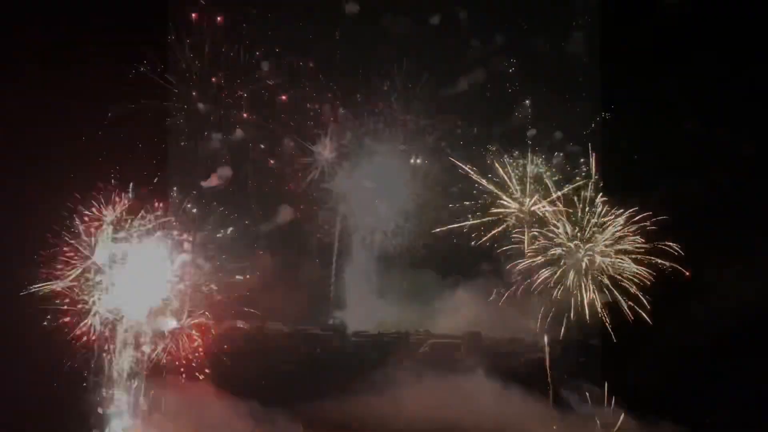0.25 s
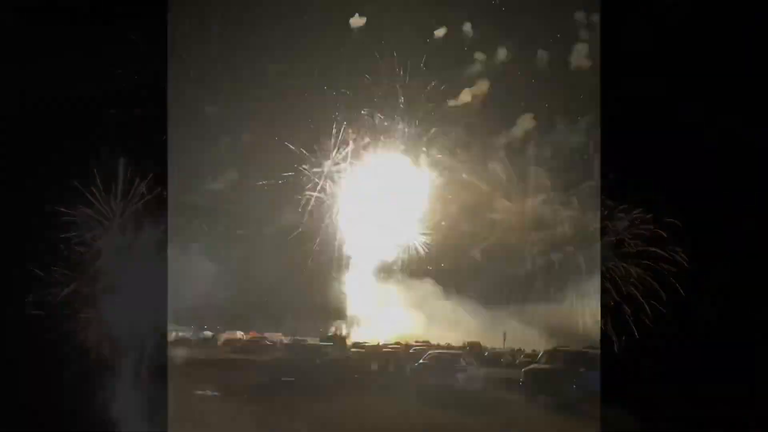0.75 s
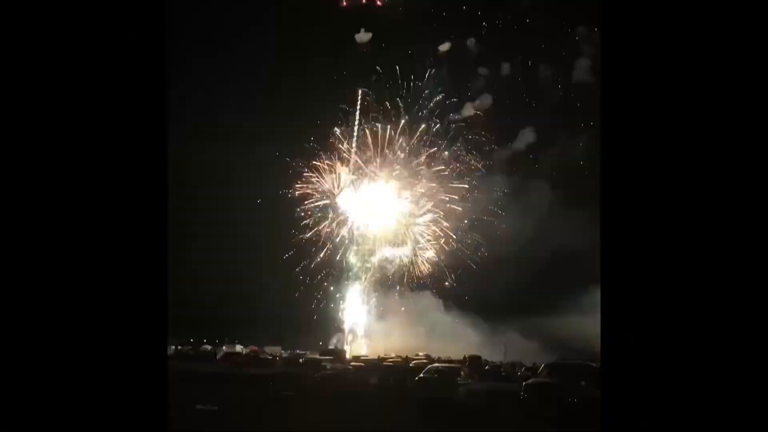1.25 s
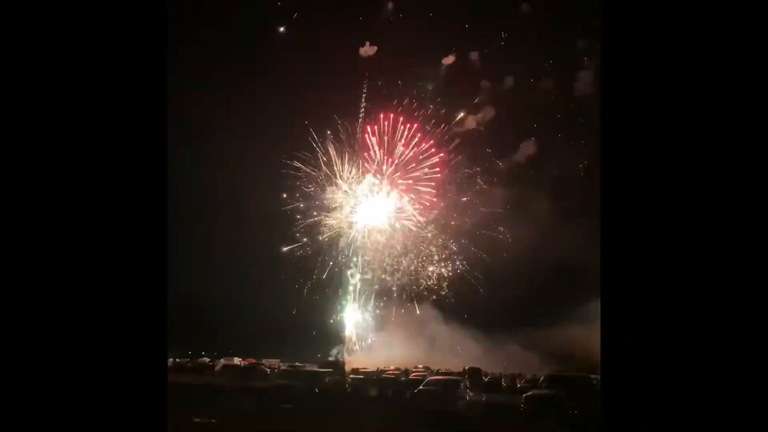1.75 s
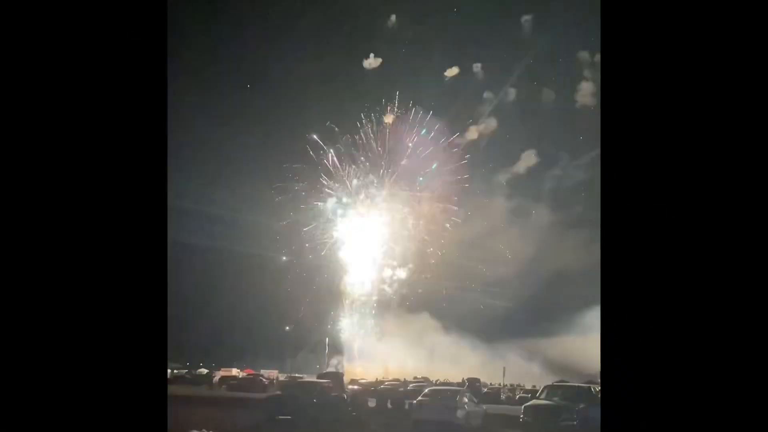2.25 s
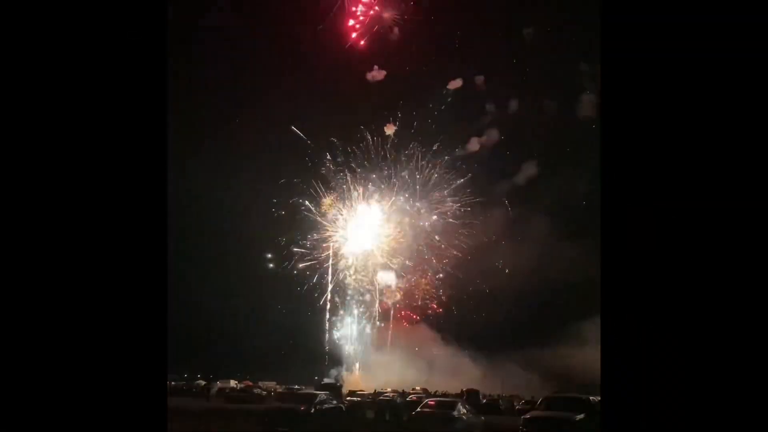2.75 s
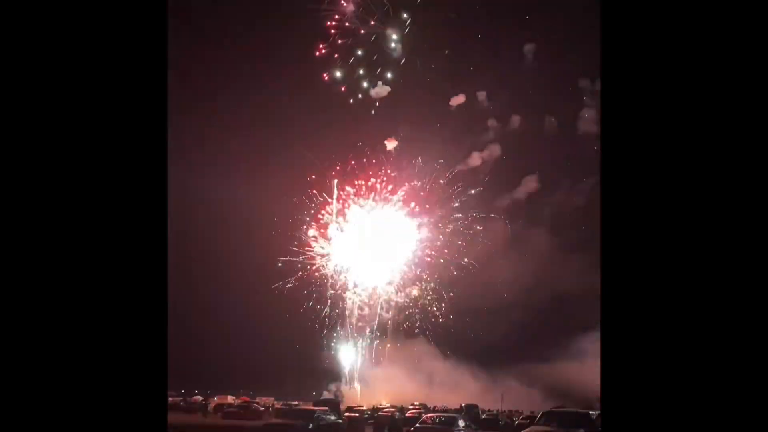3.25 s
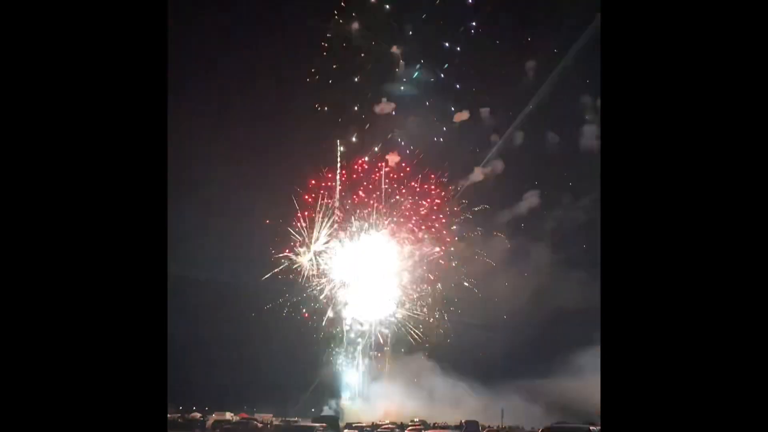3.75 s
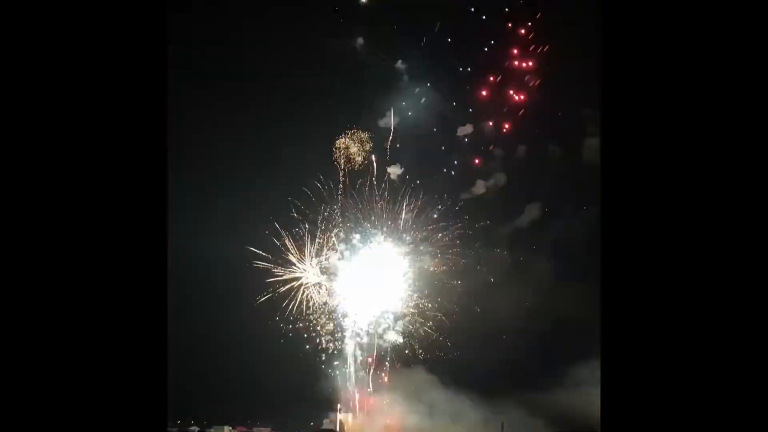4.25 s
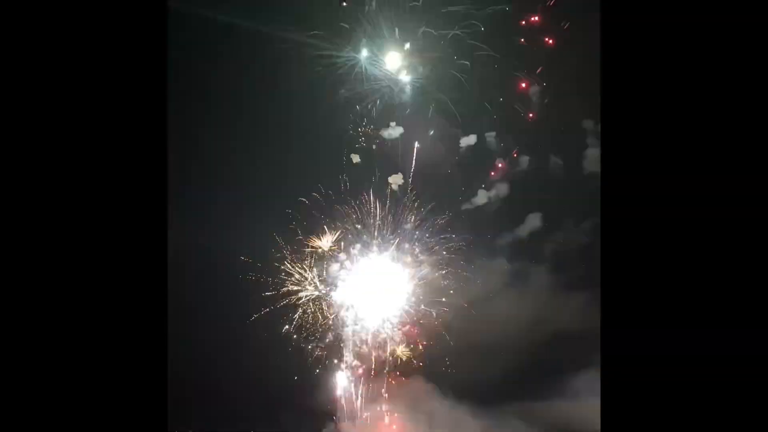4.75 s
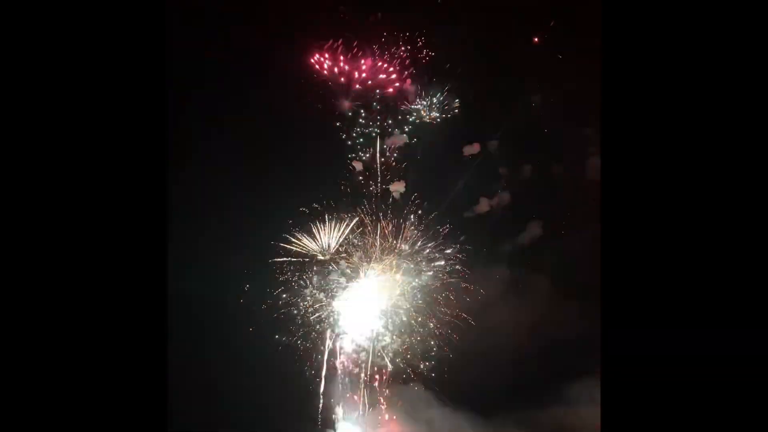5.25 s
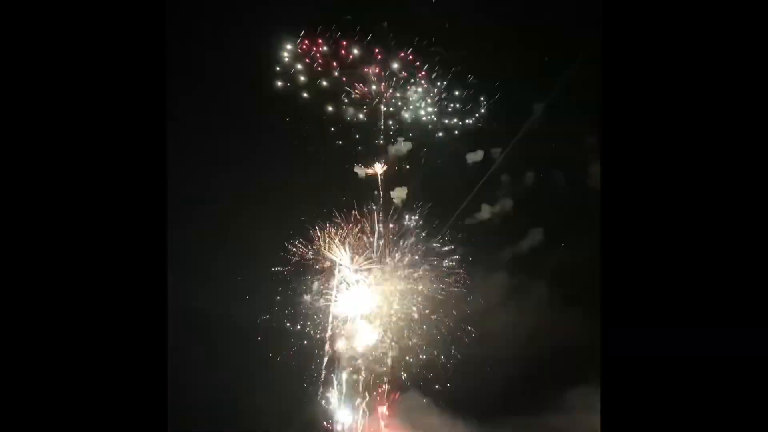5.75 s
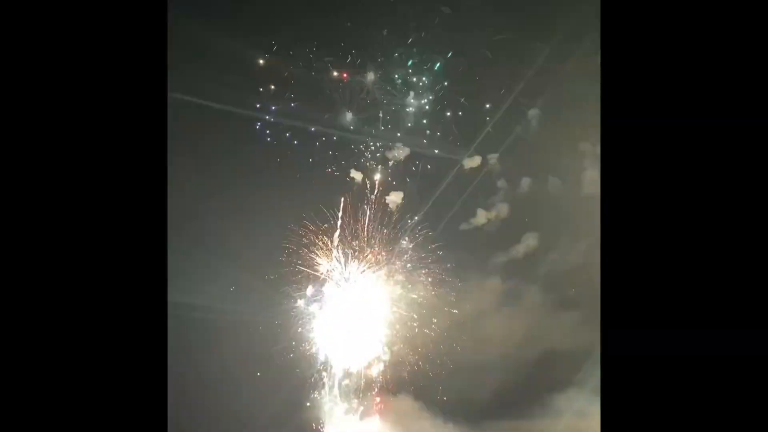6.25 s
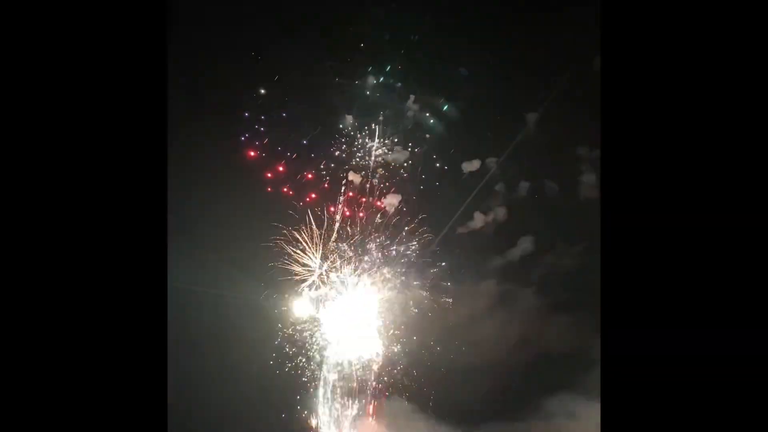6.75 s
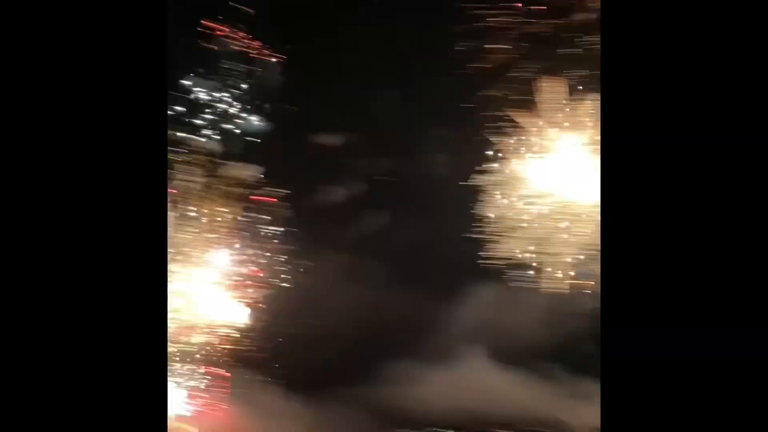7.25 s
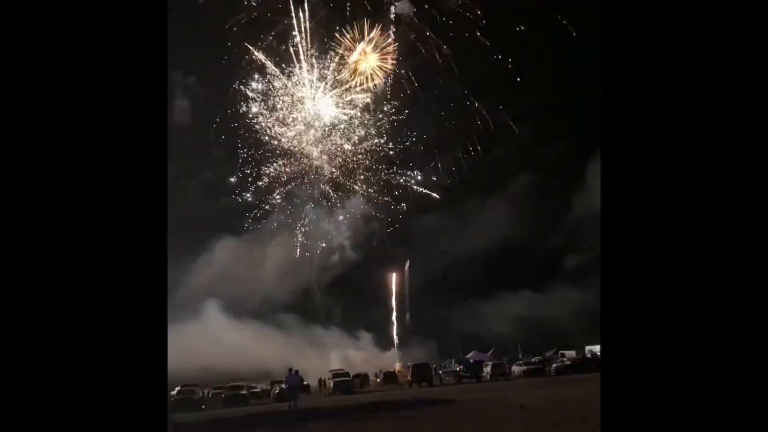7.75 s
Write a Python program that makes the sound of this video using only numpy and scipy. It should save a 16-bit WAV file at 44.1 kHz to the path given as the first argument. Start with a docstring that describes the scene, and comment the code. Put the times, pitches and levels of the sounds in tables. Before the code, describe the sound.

Many fireworks shells burst a few hundred metres away over an open field of parked cars. Punchy bangs, about forty a second, overlap irregularly with weaker pops filling the gaps. Each has a quick ground echo and short ragged scatter, above a low lumpy rumble. The barrage is already going at the start, thickens around two to three seconds, thins slightly near five, then surges again. Handheld stereo pickup, peaks rounded, little high treble.

```python
"""An open field full of parked cars: a barrage of fireworks shells bursts a few hundred metres away.
Each burst sends an N-shaped blast that arrives twice, direct and off the ground; lesser pops follow at random.
Sparse random echoes scatter it back from cars and trees, over a low, lumpy bed of noise for merged far echoes.
A handheld recorder with two ports spreads every blast into a short falling chirp and rounds the peaks."""
import sys
import numpy as np
from scipy import signal
from scipy.fft import rfft, irfft, next_fast_len
from scipy.io import wavfile

SR = 44100
rng = np.random.default_rng(int(sys.argv[2]) if len(sys.argv) > 2 else 0)


def to_wav(s):
    """Save 16-bit WAV."""
    ch = np.atleast_2d(s).T  # columns
    pcm = np.round(np.clip(ch, -1, 1) * 32767)  # PCM
    wavfile.write(sys.argv[1], SR, pcm.astype(np.int16))


N = 352359
SIZE = next_fast_len(N + 2 * SR)   # room for the scatter tail
HZ = np.maximum(np.arange(SIZE // 2 + 1) * SR / SIZE, 1)

# main shell bursts: start_s, front_level_db, blast_length_ms
SHELLS = [(0.018, -7, 4.6), (0.0214, -3, 1.7), (0.051, -3, 2.2), (0.0946, -8.5, 1.5), (0.118, -2, 1.8),
          (0.1405, -10.5, 2.4), (0.168, -20, 1.4), (0.1878, -15, 1.8), (0.212, 4, 2.5), (0.234, -4.5, 2.0),
          (0.2436, -3.5, 3.2), (0.276, -7.5, 2), (0.3, -6, 2.2), (0.3147, -6.5, 2.2), (0.3537, -15, 1.4),
          (0.3756, -4, 1.6), (0.4012, -9, 1.6), (0.4319, -11, 1.6), (0.4386, -3, 2.0), (0.456, -2.5, 2.8),
          (0.48, -7, 2.4), (0.502, -5.5, 2.1), (0.5078, -2.5, 2.0), (0.5328, -2.5, 0.92),
          (0.5596, 1.6, 2.5), (0.5988, -6, 1.8), (0.626, -9, 0.79), (0.6562, -5.5, 2.2), (0.689, -9.5, 2.6),
          (0.701, -1.5, 2.0), (0.7212, -2.5, 1.6), (0.7514, -4.5, 1.6), (0.7876, -3, 1.7),
          (0.7988, -10.5, 2), (0.8155, -3.5, 0.94), (0.8258, -8.5, 2.3), (0.9069, -4.5, 1.7),
          (0.9459, 0, 2.0), (0.9504, 0, 3.6), (0.9995, -1.5, 1.5), (1.0072, -7.5, 1.4), (1.041, -1.5, 2.2),
          (1.0535, 3.5, 3.2), (1.095, -3, 1.3), (1.1013, 2, 1.8), (1.114, -7, 1.5), (1.1349, -8, 2.6),
          (1.1479, 2, 2.5), (1.1667, -6, 2.5), (1.1935, 2.1, 2.2), (1.2276, -6.5, 2.0), (1.2486, -5, 1.6),
          (1.2577, -5.5, 1.9), (1.2641, 0.5, 2.3), (1.3167, -4, 1.4), (1.3276, 4, 2), (1.3354, -2.5, 2.0),
          (1.3557, 4.2, 2.4), (1.3651, -7.5, 2.0), (1.397, -8, 1), (1.4269, -1.6, 2.0), (1.448, -4, 2.5),
          (1.4571, -6, 3), (1.4793, -1, 2.0), (1.4904, -2, 1.8), (1.5272, 1.6, 2.5), (1.5758, -4, 1.8),
          (1.5828, -2.5, 1.6), (1.5866, -0.9, 4.3), (1.622, -1.5, 1.7), (1.6274, -4.5, 2.0),
          (1.6394, -3.9, 1.8), (1.684, -3.5, 1.7), (1.6997, -11, 1.4), (1.7189, -6, 1.8),
          (1.7476, 2.2, 2.0), (1.7531, -3.5, 2.0), (1.7972, 1.4, 4.2), (1.805, 2.6, 1.6),
          (1.8314, -2.8, 2.0), (1.8557, 2, 2.2), (1.8801, -6.5, 2.0), (1.8851, -4, 1.9), (1.926, -5, 2.2),
          (1.9348, 0.2, 1.8), (1.9721, 1.5, 2.0), (1.9944, -3.5, 2.5), (2.0066, -1.3, 2.2),
          (2.0185, 0.5, 1.9), (2.023, -12.5, 1.6), (2.0329, -4, 1.6), (2.0449, -12, 1.6),
          (2.0963, 1.9, 2.4), (2.1174, 1.9, 2.7), (2.1817, -0.4, 2.0), (2.268, 0.8, 1.6), (2.2746, -4, 2.1),
          (2.2801, 0.1, 2.4), (2.298, -12, 1.3), (2.327, -3.2, 2.0), (2.378, -7, 1.6), (2.4026, 1.8, 2.0),
          (2.4196, -2.5, 2.1), (2.4359, 5.5, 7), (2.4476, -8.5, 3.5), (2.4798, -1, 1.6), (2.4987, -3, 1.8),
          (2.537, -15.5, 2), (2.572, 1.5, 4.2), (2.5807, 3, 5.5), (2.5972, -4.5, 1.3), (2.6128, 3.4, 2.0),
          (2.6194, 3.8, 2.0), (2.6242, -0.3, 3), (2.646, -1.5, 2.2), (2.679, -1.1, 2.8), (2.687, 1.3, 1.6),
          (2.6962, -7.5, 1.8), (2.699, 4.8, 4.2), (2.7047, 1.5, 2.7), (2.7114, 6, 3.6), (2.717, -0.3, 3.1),
          (2.7303, -5.5, 2.5), (2.7473, -3.5, 2.2), (2.7626, -6, 2.0), (2.7994, 4, 4.2), (2.8137, -7, 3),
          (2.8286, -7.5, 2), (2.8353, -7.5, 1.9), (2.845, -7, 2), (2.8642, -7.5, 1.2), (2.8726, -3, 2.0),
          (2.8908, -1, 3.9), (2.9061, -0.5, 2.7), (2.9116, -2, 2.0), (2.9176, -2.5, 1.6),
          (2.9301, -6.5, 2.8), (2.945, -3, 2.0), (2.9624, 0.5, 2.0), (2.979, -2.5, 2.9),
          (2.9965, 4.06, 3.6), (3.014, -0.5, 5.5), (3.0316, -9, 1.8), (3.0437, -3.5, 2.5),
          (3.0632, 1.5, 3.2), (3.0717, -2.5, 2.2), (3.095, -8.5, 1.7), (3.1019, -3.5, 2.3),
          (3.1158, -10, 1.9), (3.1269, -2, 2.6), (3.182, -8.5, 1.6), (3.2062, -5, 0.85), (3.2324, 2.6, 4.2),
          (3.2707, -6, 1.6), (3.311, 1, 1.8), (3.3235, -3.5, 0.86), (3.3383, -7, 0.88), (3.3528, -3, 2.5),
          (3.365, -6, 1), (3.3859, -7.5, 0.79), (3.3973, -2, 2.2), (3.4049, 1, 2.0), (3.4114, 1.7, 2.5),
          (3.4833, -7.5, 0.82), (3.4977, -1, 2.2), (3.52, -5, 1.6), (3.543, -6.5, 0.99), (3.552, -7, 1.6),
          (3.562, -2.4, 3.4), (3.5839, -1, 1.7), (3.6087, -6, 0.8), (3.6255, -10, 1.5), (3.6636, -1, 2.0),
          (3.6771, -4, 1.6), (3.6825, -1.8, 2.0), (3.6959, 2, 2.3), (3.7454, 0.2, 2), (3.7735, 2, 2),
          (3.7826, -5, 1.9), (3.8297, -2, 2.2), (3.9033, -4, 1.8), (3.917, 3, 2), (3.9281, -0.9, 4.2),
          (3.9525, 0.7, 2.5), (3.979, -8, 1.4), (3.9906, -3.5, 2.3), (3.9959, -1.1, 2.5), (4.135, -9, 1.6),
          (4.156, -7, 1.6), (4.2132, 2.9, 2.3), (4.2386, -3, 1.6), (4.257, -1, 2.0), (4.2718, -1.5, 1.6),
          (4.298, -9.5, 1.5), (4.3155, -5, 1.8), (4.3573, -7, 1.6), (4.3748, -6, 2.3), (4.3825, -8.5, 2.0),
          (4.4012, -9.5, 1.4), (4.4109, -1.5, 2.2), (4.4353, -5.8, 1.8), (4.4511, -2.5, 1.6),
          (4.457, -2.5, 1.2), (4.5032, 6, 5.6), (4.5648, -3, 1.9), (4.5981, 0.5, 4.1), (4.753, -6.5, 1.6),
          (4.8099, -6, 1.6), (4.8198, -8.5, 1.6), (4.8427, -5.5, 1.6), (4.8986, 0, 1.6), (4.934, -8, 1.6),
          (4.952, -5.5, 1.9), (5.0206, -6.5, 1.6), (5.0284, -5, 1.6), (5.0433, 1.3, 2.0),
          (5.0598, -3.5, 2.0), (5.069, -10.5, 1.3), (5.082, -5.5, 1.7), (5.115, -1.2, 2.0),
          (5.1442, -8, 1.1), (5.201, -0.4, 1.6), (5.2054, 4.15, 3), (5.23, -6.5, 1.4), (5.2426, -7.5, 2.2),
          (5.278, -12.5, 1.6), (5.3033, -3.9, 2.7), (5.3147, 5.5, 3.2), (5.3267, -8.5, 2.5),
          (5.371, -4.5, 1.8), (5.3941, -11.5, 1.5), (5.4303, -2, 1.9), (5.4611, -6.5, 1.5),
          (5.4875, -8, 1.5), (5.5096, -5, 1.6), (5.5149, -5.5, 2.2), (5.5671, -1.5, 1.6),
          (5.5996, -0.5, 2.8), (5.6056, 0, 2.0), (5.6278, 3.5, 3), (5.6611, -9, 1.1), (5.7572, -5.5, 2.1),
          (5.7669, -7, 1.6), (5.7906, -5.5, 1.9), (5.8475, -4.5, 1.8), (5.8932, -9, 1.1),
          (5.9467, -7.5, 1.1), (5.9656, -0.3, 2.0), (6.0268, -7.5, 1.8), (6.0395, -4, 1.6),
          (6.0445, -0.5, 2.0), (6.081, -12, 1.5), (6.1045, -5, 2.2), (6.1357, -2.5, 2.0),
          (6.1811, -5.5, 1.3), (6.2306, -2.0, 1.8), (6.2421, -7, 1.6), (6.273, -1, 1.6),
          (6.324, -10.5, 1.2), (6.3311, -1.5, 1.9), (6.336, -6.5, 1.4), (6.377, -9, 1.4), (6.3874, -4.5, 2),
          (6.3949, -5.5, 2.6), (6.4006, -3.5, 2.2), (6.4146, -13, 1.6), (6.4294, 1.4, 2.0),
          (6.4528, -5, 2.0), (6.4748, -3, 1.6), (6.5161, -9, 1.4), (6.5269, 2.5, 1.8), (6.5298, 3.5, 2.8),
          (6.5515, 2, 3.9), (6.5563, 2.5, 2.5), (6.5815, -5, 1.7), (6.6225, 5, 2.2), (6.6313, -5, 1),
          (6.655, -10, 1.2), (6.6686, -6, 1.6), (6.6771, -2, 1), (6.693, 0.5, 0.74), (6.7161, -5, 2.5),
          (6.7321, -2.5, 1.6), (6.7365, -4, 1.4), (6.7443, -2, 2.6), (6.7491, -0.5, 2.3),
          (6.8101, 1.5, 1.3), (6.8152, 5.5, 2.5), (6.8257, 3.5, 2.5), (6.8499, 4.5, 2.5),
          (6.885, -9.5, 1.1), (6.8962, -6.5, 1.6), (6.926, -7, 1), (6.9584, 2.6, 1.8), (6.981, -14.5, 1.4),
          (6.996, -1, 1.4), (7.0011, 2.4, 2.1), (7.0059, -6, 2.4), (7.0387, -11, 1.2), (7.0467, -1.5, 1.6),
          (7.055, -2, 2), (7.0757, -4.5, 1.3), (7.0884, -3.5, 1.6), (7.1393, 0.8, 3.8), (7.1438, -3.3, 2.5),
          (7.164, -1.5, 1.4), (7.1717, -3.8, 2.7), (7.2566, -4.0, 1.4), (7.2817, -8.5, 0.92),
          (7.3496, -1, 1.8), (7.3784, -6, 1.4), (7.3893, 0.3, 2.0), (7.4067, 0, 1.9), (7.4166, -2.5, 1.8),
          (7.4278, 3, 3), (7.4483, -2, 2.2), (7.465, -6.5, 2.0), (7.4836, 0.9, 1.1), (7.5135, -3.5, 1.6),
          (7.5403, -3.5, 1.2), (7.551, -3, 1.5), (7.5576, -4.5, 2.2), (7.5649, -5, 1.6), (7.595, -4, 1.4),
          (7.6324, 0, 2.3), (7.6534, -2.5, 2.0), (7.6913, -4.5, 1.1), (7.7254, 0.5, 1.9), (7.732, -4, 1.2),
          (7.7632, -9.5, 2.5), (7.7969, 1.6, 1.7), (7.8198, -6, 1.6), (7.8278, -3.5, 1.3),
          (7.8356, -6.5, 1.4), (7.853, -10, 1.4), (7.8724, -5.5, 1.6), (7.9037, -5.5, 1.3),
          (7.9283, -5.5, 1.6), (7.9389, -3.5, 1.6), (7.9474, -3, 4.2), (7.9763, -8, 1.6)]


def from_db(db):
    """Converts dB to amplitude gain."""
    return 10 ** (np.asarray(db) / 20)


def at_hz(points):
    """Interpolates a (Hz, value) curve over log frequency at every FFT bin."""
    hz, value = np.transpose(points)
    return np.interp(np.log(HZ), np.log(np.maximum(hz, 1)), value)


def filtered(order, cutoff_hz, x):
    """Butterworth high-pass."""
    return signal.sosfilt(signal.butter(order, cutoff_hz, "high", fs=SR, output="sos"), x)


def stereo_spectrum(mid, side):
    """Left and right spectra mixed from two unrelated noises: alike in the bass, unrelated in the treble."""
    alike_hz = 1800
    alike = 1 / (1 + (HZ / alike_hz) ** 2)
    common = np.sqrt(1 + alike) * rfft(mid, SIZE)
    opposed = np.sqrt(1 - alike) * rfft(side, SIZE) * [[1], [-1]]
    return (common + opposed) / np.sqrt(2)


def rumble():
    """Far echoes of earlier bursts, merged: shaped stereo noise whose level wanders at random."""
    level_db, lumps_db, lump_step = -27, 3.0, 1000   # lump_step in samples
    # relative spectrum of the merged echoes: frequency_hz, density_db_per_hz
    bed_spectrum = [(18, -38.5), (30, -9), (92, 0.5), (129, -8), (250, -11.5), (653, -31.5), (1050, -32.5),
                    (1500, -46.5), (3200, -50), (4500, -65.5), (7000, -85.5), (9100, -112), (15400, -120)]
    noise = rng.standard_normal((2, SIZE))
    bed = irfft(stereo_spectrum(*noise) * from_db(at_hz(bed_spectrum)), SIZE)[:, :N]
    knots = rng.standard_normal(N // lump_step + 2)
    lumps = np.interp(np.arange(N), np.arange(0, N + lump_step, lump_step), knots)
    return from_db(level_db + lumps_db * lumps) * bed / bed.std()


def far_scatter():
    """Stereo response of far cars, then far trees: sparse echoes that die away, denser and duller from the trees."""
    # far cars, far trees: t60_s, level_db, dullness_hz, echoes_per_s
    reflectors = [(0.248, -14, 9170, 1900), (1.498, -21, 1960, 6500)]
    t = np.arange(2 * SR) / SR
    response = 0
    for t60_s, level_db, dull_hz, echoes_per_s in reflectors:
        hits = (t > .001) * (rng.random(len(t)) < echoes_per_s / SR)
        echoes = from_db(-60 * t / t60_s) * hits
        unit_echoes = echoes / np.sqrt(np.sum(echoes ** 2) + 1e-12)
        mid, side = rng.standard_normal((2, len(t))) * unit_echoes
        response = response + from_db(level_db) * stereo_spectrum(mid, side) / (1 + 1j * HZ / dull_hz)
    return response


def near_paths(count):
    """Per blast, a short ragged tail off near cars above a corner pitch, with a brighter own part at each port."""
    t60_s, level_db, corner_hz = 0.048, -6.5, 560
    own_hz, own_db, taps = 1300, 2.5, 1200
    fade = from_db(-60 * np.arange(taps) / (SR * t60_s))
    unit_fade = fade / np.sqrt(np.sum(fade ** 2))
    tails = rng.standard_normal((count, 3, taps)) * from_db(level_db) * unit_fade
    shared, own = tails[:, :1], filtered(2, own_hz, tails[:, 1:])
    return filtered(1, corner_hz, shared + from_db(own_db) * own)


def n_wave(ms, level_db, length_ms, front_hz):
    """Shock wave: a jump, a straight fall into underpressure, a slow recovery; air rounds most of the front."""
    suction = 0.66 + 0.051 * length_ms   # long blasts pull a deeper underpressure
    recovery_lengths = 0.41   # time constant in blast lengths
    fall = 1 - (1 + suction) * ms / length_ms
    recovery = -suction * np.exp(-np.maximum(ms - length_ms, 0) / (recovery_lengths * length_ms))
    wave = np.where(ms < length_ms, fall, recovery)
    # more of the front stays steep in strong, long blasts
    shock_db, shock_db_per_db, shock_db_per_ms = -38, 5, 1.1
    steep = min(from_db(shock_db + shock_db_per_db * level_db + shock_db_per_ms * length_ms), 1)
    r = np.exp(-2 * np.pi * front_hz / SR)
    rounded = signal.lfilter([(1 - r) ** 2], [1, -2 * r, r * r], wave)
    return from_db(level_db) * (steep * wave + (1 - steep) * rounded)


def blasts(rows):
    """Direct blasts, their delayed ground echoes, and near scatter at the left and right port, as four rows."""
    front_hz, front_spread_octaves = 1986, 0.73
    # longer blasts burst higher: their ground echo comes later
    lag_ms, lag_ms_per_ms, lag_spread_ms = 1.563, 0.31, 0.89
    ground_db = -2.5
    out = np.zeros((4, SIZE))
    ms = np.arange(SR // 20) * 1000 / SR
    paths = near_paths(len(rows))
    fronts_hz = front_hz * 2 ** (front_spread_octaves * (rng.random(len(rows)) - .5))
    lags_ms = lag_ms + lag_ms_per_ms * np.array(rows)[:, 2] + lag_spread_ms * (rng.random(len(rows)) - .5)
    for (start_s, level_db, length_ms), lag, path, corner_hz in zip(rows, lags_ms, paths, fronts_hz):
        wave = n_wave(ms, level_db, length_ms, corner_hz)
        at, late = round(start_s * SR), round((start_s + lag / 1000) * SR)
        out[0, at:at + len(ms)] += wave
        out[1, late:late + len(ms)] += from_db(ground_db) * wave
        out[2:, at:at + len(ms)] += signal.fftconvolve(path, wave[None], axes=1)[:, :len(ms)]
    return out


def small_bursts():
    """Rows for the lesser pops: most shells get one, weaker, after an exponentially random wait."""
    chance, mean_wait_s, level_db, level_spread_db = .8, .012, -9, 6.0
    start_s, shell_db, _ = np.transpose(SHELLS)
    u = rng.random((len(start_s), 4))
    pop_s = start_s - mean_wait_s * np.log(u[:, 0])
    pop_db = np.minimum(shell_db, 0) + level_db + level_spread_db * (u[:, 1] - .5)
    pop_length_ms = 1.1 + u[:, 2]
    return np.c_[pop_s, pop_db, pop_length_ms][u[:, 3] < chance]


def scene():
    """Direct and ground sound reach the ports with a phase lead; all blast sound is tilted; rumble lies below."""
    grass_hz = 3640   # the ground dulls its echo
    # phase by which the left port leads: frequency_hz, lead_rad
    port_lead = [(120, 0), (600, 0.4), (1890, 0.4), (2330, 1.4), (2930, 1.4), (3790, .8), (5340, 0.6),
                 (6980, 2.9), (8610, 4.2), (9650, 6.0), (12100, 6.8), (12900, 9.1), (13800, 9.4),
                 (15300, 12.5), (16500, 12.2)]
    # level balance of the ports: frequency_hz, left_minus_right_db
    port_tilt = [(60, 0.5), (150, -2), (380, -1.5), (950, -0.5), (2380, -0.5), (5980, -0.5), (15000, 0.5)]
    direct, echo, *near = rfft(blasts(SHELLS) + blasts(small_bursts()))
    air = direct + echo / (1 + 1j * HZ / grass_hz)
    half = np.array([[.5], [-.5]])   # left, right
    led = air * np.exp(1j * half * at_hz(port_lead))
    ports = from_db(half * at_hz(port_tilt)) * (led + near + air * far_scatter())
    return irfft(ports, SIZE)[:, :N] + rumble()


def record(dry):
    """Recorder: bass cut, microphone colour, a chain of phase rotators, rounded peaks, top cut."""
    ceiling, top_cut_hz = 0.93, 16500   # ceiling in full scale
    rotators_hz = 50 * 1.49 ** np.arange(14)
    # microphone response: frequency_hz, gain_db
    mic_colour = [(35, -2.5), (80, -1), (125, -1), (175, 3), (260, 0.5), (400, -0.5), (600, 0), (1000, 2.5),
                  (2000, 2), (3000, 0), (5500, -1), (6700, -5.5), (7600, -13), (9000, -10), (12000, -14.5),
                  (16000, -10)]
    x = filtered(3, 55, filtered(1, 130, dry))
    x = irfft(rfft(x, SIZE) * from_db(at_hz(mic_colour)), SIZE)[:, :N]
    for hz in rotators_hz:   # each all-pass delays the lows more than the highs: a bang becomes a falling chirp
        tan = np.tan(np.pi * hz / SR)
        a = (tan - 1) / (tan + 1)
        x = signal.lfilter([a, 1], [1, a], x)
    x = ceiling * np.tanh(x / ceiling)
    return signal.sosfilt(signal.cheby2(12, 80, top_cut_hz, fs=SR, output="sos"), x)


dry = scene()
out = record(dry)
to_wav(out)
```